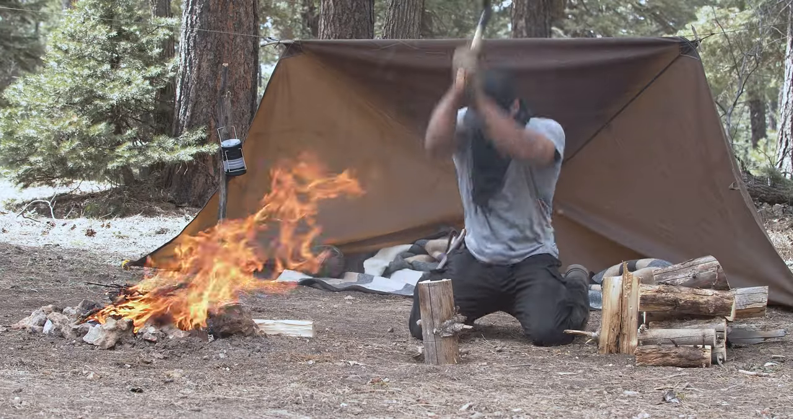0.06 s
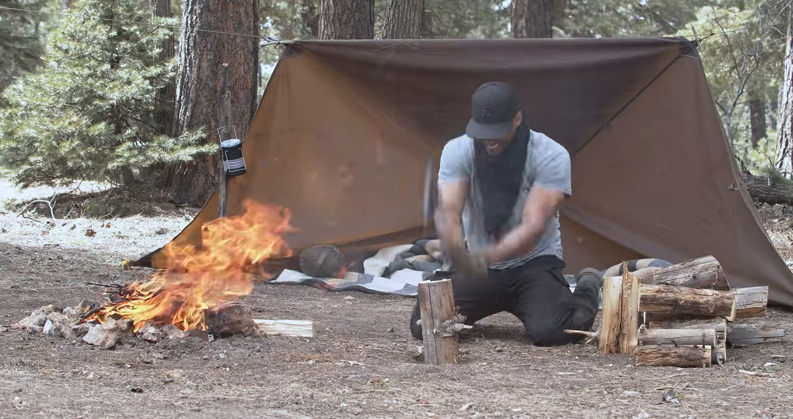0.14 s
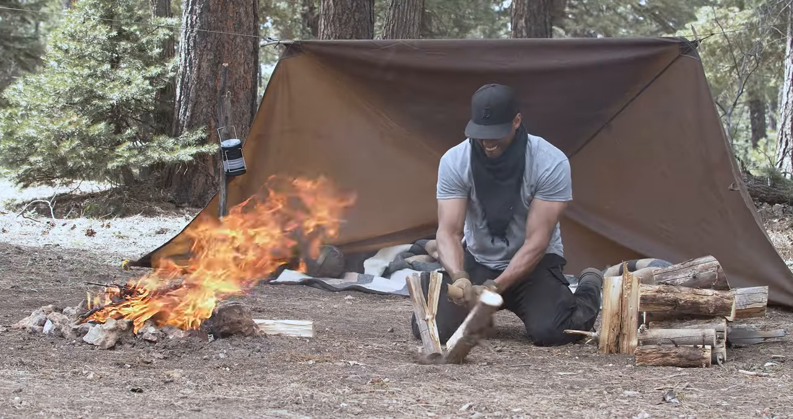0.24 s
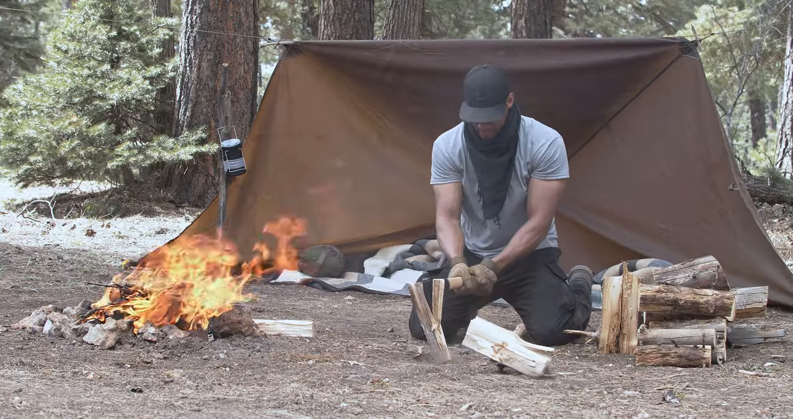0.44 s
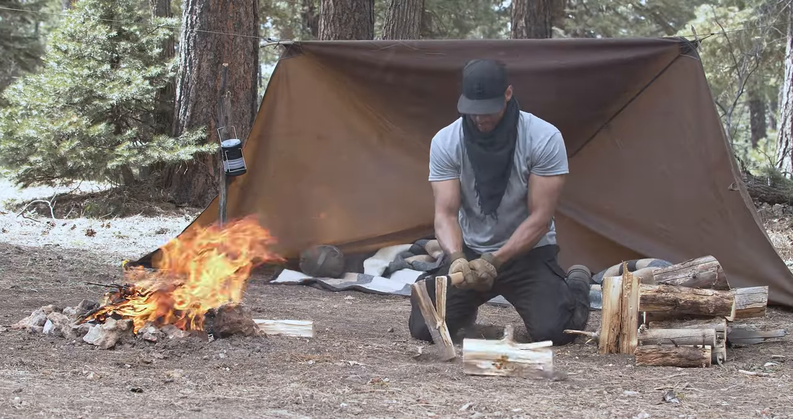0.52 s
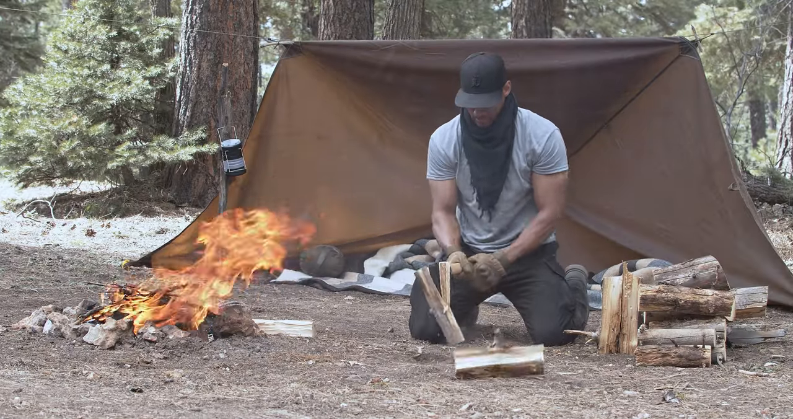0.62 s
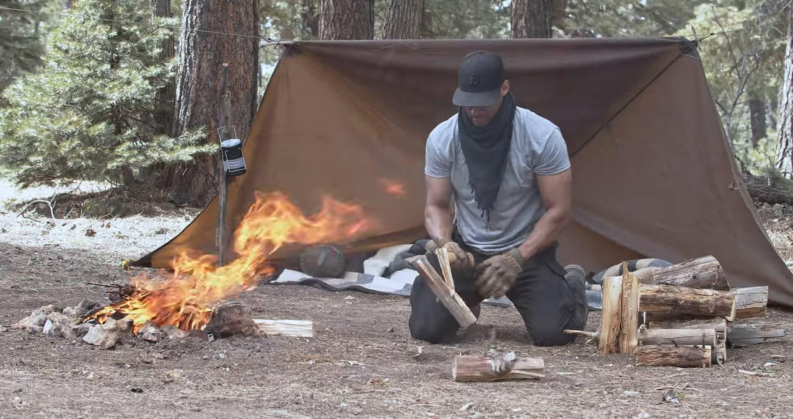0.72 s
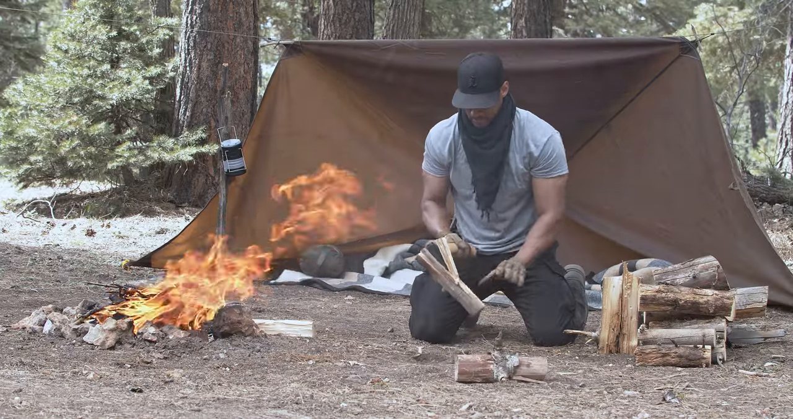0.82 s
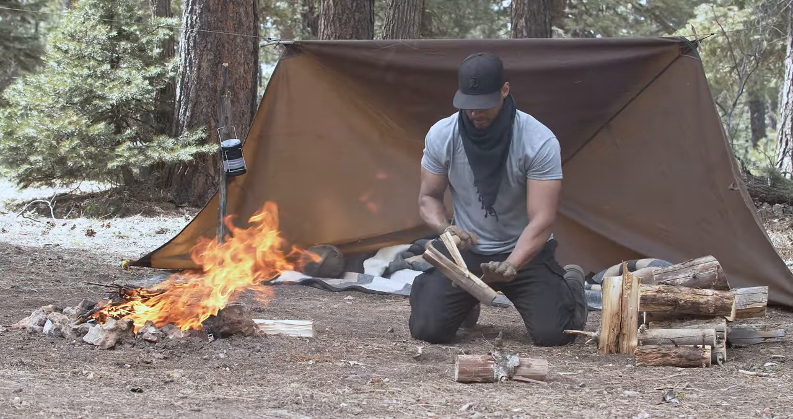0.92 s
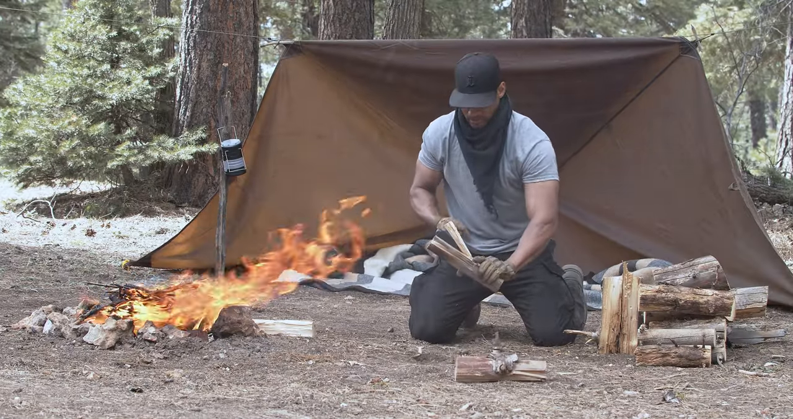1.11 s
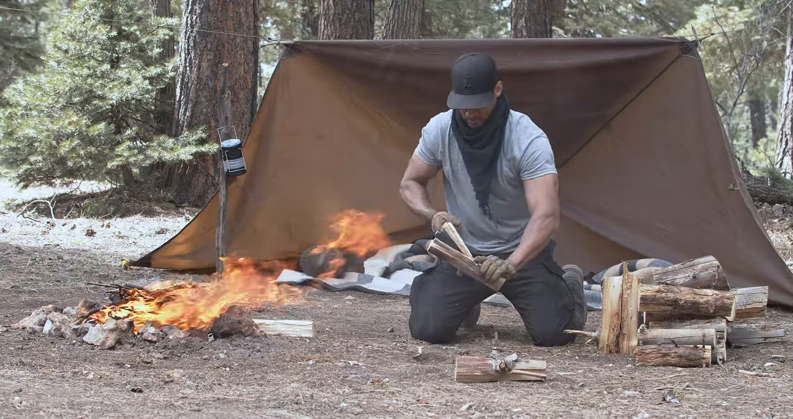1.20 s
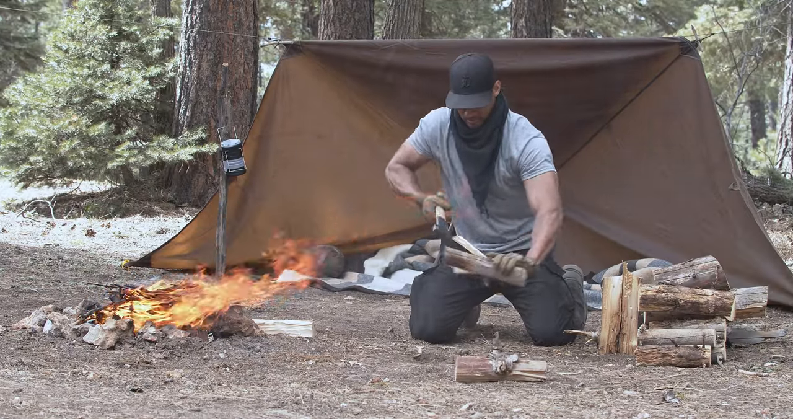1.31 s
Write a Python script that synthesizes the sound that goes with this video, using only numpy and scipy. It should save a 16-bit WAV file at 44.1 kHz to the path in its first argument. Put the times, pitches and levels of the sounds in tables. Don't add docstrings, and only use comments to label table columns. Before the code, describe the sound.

A hatchet splits a dry log close to a small bright microphone, the loud crack distorting briefly, with a dull ground thump and forest echoes; a campfire roars low, and kindling knocks lightly at the end.

```python
import sys
import numpy as np
from scipy import signal
from scipy.fft import rfft, irfft
from scipy.io import wavfile
from scipy.ndimage import uniform_filter1d

SR = 44100
rng = np.random.default_rng(int(sys.argv[2]) if len(sys.argv) > 2 else 0)


def file_out(sig):
    cols = np.atleast_2d(sig).T
    lim = np.clip(cols, -1, 1)
    pcm = np.round(lim * 32767).astype(np.int16)
    wavfile.write(sys.argv[1], SR, pcm)


def decibels_to_gain(level_db):
    exponent = np.asarray(level_db, float) / 20
    return 10 ** exponent


N = 59535

BLOW_S, TEAR_S = 0.2299, 0.014
# freq_hz, level_db
FIBRE_COLOUR = [(300, -13), (1200, -21), (2300, -5), (3100, -4.5), (5500, -1), (8000, -7.5), (11000, -18.5),
                (16000, -15)]


def shape(table, size):
    hz, db = np.array(table, float).T
    bins_hz = np.arange(size // 2 + 1) * SR / size
    return np.interp(np.log(bins_hz + 1), np.log(hz), db)


def colour(x, table):
    cepstrum = irfft(shape(table, size=4096) * np.log(10) / 20)
    folded = np.r_[cepstrum[0], 2 * cepstrum[1:2048], np.zeros(2048)]
    impulse = irfft(np.exp(rfft(folded)))
    return signal.fftconvolve(x, impulse)[:len(x)]


def band(x, hz, width):
    b, a = signal.iirpeak(min(hz, 0.45 * SR), hz / width, fs=SR)
    return signal.lfilter(b, a, x)


def unit(x):
    return x / np.sqrt(np.mean(x ** 2))


def walk(rate):
    hold = int(SR / rate)
    steps = np.repeat(rng.standard_normal(N // hold + 1), hold)
    return 2.0 * uniform_filter1d(uniform_filter1d(steps, hold), hold)[:N]


def ring(after, hz, t60):
    a = np.maximum(after, 0)
    return np.sin(2 * np.pi * hz * a) * decibels_to_gain(-60 * a / t60)


def fire():
    # freq_hz, level_db (per Hz)
    air_colour = [(18, -11.5), (30, -3), (100, -9), (300, -18), (800, -14.5), (1900, -20.5), (5000, -40.5),
                  (16000, -52)]
    air_db, bass_flutter_db = -44, 0.8
    gust = walk(3)
    white = rng.standard_normal(N + 4096)
    roar = rfft(colour(white, air_colour)[4096:])
    octave = np.log2(np.arange(len(roar)) * SR / N + 1)
    out = 0
    for centre in np.arange(4, 14.6, 0.5):
        part = irfft(roar * np.clip(1 - 2 * abs(octave - centre), 0, 1), N)
        bass = np.clip(1 - 2 ** centre / 170.0, 0, 1)
        shared_db = (-0.1 + bass_flutter_db * bass) * gust
        own_db = (1.0 + bass_flutter_db * bass) * walk(17)
        out = out + part * decibels_to_gain(shared_db + own_db)
    return unit(out) * decibels_to_gain(air_db)


def ticks(t):
    # start_s, peak_db, pitch_hz, t60_s
    tick_events = [(.0458, -26, 6080, 0.0032), (.0459, -38.5, 8620, 0.0079), (.0459, -35.5, 4500, 0.0055),
                   (0.0463, -46.5, 12800, 0.0035), (0.1187, -41, 4500, 0.0029), (.1186, -54, 6500, .004),
                   (.465, -48, 14200, .006), (.465, -43.5, 15250, 0.0056), (1.2822, -30.5, 2710, 0.017),
                   (1.2835, -40.5, 3870, .013), (1.2847, -44, 5200, 0.01), (1.2834, -46, 7080, 0.0045),
                   (1.284, -51, 9120, 0.0054), (1.3347, -25, 4180, 0.0057), (1.335, -30, 2950, .012),
                   (1.3345, -48, 6600, 0.0033), (1.347, -45, 3864, 0.016)]
    out = 0
    for (s, db, hz, t60), chance in zip(tick_events, rng.random((len(tick_events), 2))):
        second_hz = hz * (1.0 + 0.12 * chance[0])
        pair = ring(t - s, hz, t60) + 0.86 * ring(t - s - 0.0003, second_hz, 0.8 * t60)
        swell = np.clip((t - s) * hz / 3.8, 0, 1)
        pair = pair * swell * decibels_to_gain(4.5)
        snap_db = -18.5 - 12 * (hz < 5000)
        out = out + decibels_to_gain(db) * (pair + decibels_to_gain(snap_db) * ring(t - s, 14800, 0.0054))
    return out


def split(t):
    # freq_hz, level_db, t60_s
    log_modes = [(1925, 6, 0.031), (2324, 1, 0.05), (2936, -14, .05), (3584, -5.5, 0.048),
                 (3948, -14.5, .06), (4441, -6, 0.031), (5420, -12, .04), (5400, -6.5, .04),
                 (6030, -7, 0.01), (7860, -6.5, .03)]
    tear_db, sag_db, halves_db = 0.5, -8.5, -22.5
    fibres_per_s, fibre_spread_db = 16000, 2
    after_db, after_t60_s = -20, 0.17
    a = t - BLOW_S
    chance = rng.random((3, N))
    hits = chance[0] < fibres_per_s / SR
    strength = decibels_to_gain(-fibre_spread_db * np.log(chance[2] + 0.031))
    snaps = hits * np.sign(chance[1] - 0.5) * strength

    late = np.maximum(a - TEAR_S, 0)
    running = decibels_to_gain(sag_db * np.clip(a / TEAR_S, 0, 1) ** 2) * decibels_to_gain(-60 * late / 0.008)
    stragglers = decibels_to_gain(after_db - 60 * late / after_t60_s)
    env = (running + stragglers) * np.clip(a / 0.00017, 0, 1)

    tear = env * unit(colour(snaps, FIBRE_COLOUR))
    body = sum(decibels_to_gain(db) * ring(t[:SR // 2], hz, t60) for hz, db, t60 in log_modes)
    halves = signal.fftconvolve(env * unit(snaps), body)[:N]
    return decibels_to_gain(tear_db) * tear, decibels_to_gain(tear_db + halves_db - 13) * halves


def thump(t):
    # after_blow_s, freq_hz, level_db, t60_s
    soil_modes = [
        (0.0137, 84, -16, 0.17),
        (0.011, 91.3, -24.5, 0.22),
        (0.0004, 370, -4.5, 0.011),
        (.03, 138, -40.5, 0.81),
        (0.016, 250, -23, 0.027),
        (0.037, 190, -37, 0.073),
        (0.056, 300, -34.5, 0.047),
        (0.18, 60.8, -38.5, 0.11),
        (0.25, 226, -38.5, 0.056),
    ]
    return sum(decibels_to_gain(db) * ring(t - BLOW_S - s, hz, t60) for s, hz, db, t60 in soil_modes)


def trunks(t):
    # freq_hz, level_db, t60_s
    trunk_bands = [(700, -38, 0.18), (1500, -19.5, 0.6), (2200, -25.5, .6), (3290, -26.5, 0.58),
                   (4500, -31.5, 0.45), (6300, -40.5, .5), (9000, -43, 0.23), (14000, -39.5, 0.22)]
    far_db, far_stretch, patchy_db = -14, 2.585, 1.5
    a = np.maximum(t - BLOW_S - TEAR_S, 0)
    echo = 0
    for hz, db, t60 in trunk_bands:
        fade = decibels_to_gain(-60 * a / t60) + decibels_to_gain(far_db - 60 * a / (t60 * far_stretch))
        patches = decibels_to_gain(db + patchy_db * walk(90))
        width = 0.44 * hz
        scatter = band(band(rng.standard_normal(N), hz, width), hz, width)
        echo = echo + patches * fade * scatter
    build = np.clip((t - BLOW_S) / 0.016, 0, 1)
    return colour(echo * build, FIBRE_COLOUR) * decibels_to_gain(11)


def scuffs(t):
    # start_s, level_db, pitch_hz, length_s
    scuff_events = [(.26, -34, 7300, .005), (.279, -27.5, 4280, .006), (0.367, -56, 14000, .007),
                    (.25, -14, 3500, .006), (1.347, -51.5, 6000, .004), (0.396, -52.5, 6510, 0.0054),
                    (.445, -58, 8100, 0.0083), (0.516, -57, 7900, 0.0062), (.542, -55, 6500, .005),
                    (.637, -55.5, 6587, .008), (.698, -58, 6700, 0.0098), (0.733, -60, 6540, 0.0035),
                    (.761, -49.5, 6260, .008), (.853, -54.5, 6080, .01), (0.897, -58, 5930, 0.015),
                    (1.056, -62.5, 5500, 0.011), (0.888, -46.5, 4500, .002), (1.137, -50, 5000, .002),
                    (1.284, -44.5, 5440, .002), (1.285, -53.5, 12040, .002), (1.336, -47, 3600, .003),
                    (0.762, -58, 12950, .002), (1.315, -52, 5100, 0.026)]
    grit = unit(rng.standard_normal(N) * decibels_to_gain(1.7 * rng.exponential(size=N)))
    out = 0
    for s, db, hz, length in scuff_events:
        a = (t - s) / length
        puff = grit * np.where(a < 0, np.exp(-4 * a ** 2), np.exp(-np.abs(a)))
        scrape = band(band(puff, hz, 0.55 * hz), hz, 0.62 * hz)
        edge = decibels_to_gain(-15.5) * band(puff, 16000.0, 2500.0)
        out = out + decibels_to_gain(db + 9) * (scrape + edge)
    return out


def scene():
    t = np.arange(N) / SR
    background = fire() + ticks(t)
    crack, halves = split(t)
    return (background + crack + halves + thump(t) + trunks(t) + scuffs(t))[None]


def low_pass(x):
    return signal.sosfilt(signal.butter(12, 15910, fs=SR, output="sos"), x)


def record(dry):
    # freq_hz, level_db
    mic_colour = [(20, 2.5), (7000, 0), (11000, -4), (13000, 0.5), (15000, 2), (17000, -2.5)]
    self_noise_db, whine_db, whine_hz, top_hz = -69.5, -76, 15050, 15900
    ceiling, knee = 1.04, 4.5
    x = colour(dry[0] + decibels_to_gain(self_noise_db) * rng.standard_normal(N), mic_colour)
    x = x + decibels_to_gain(whine_db) * unit(band(rng.standard_normal(N), whine_hz, 25.0))
    x = x * ceiling / (ceiling ** knee + np.abs(x) ** knee) ** (1 / knee)
    x = signal.sosfiltfilt(signal.ellip(8, 0.1, 50, top_hz, fs=SR, output="sos"), x)
    return low_pass(x[None])


dry = scene()
out = record(dry)
file_out(out)
```